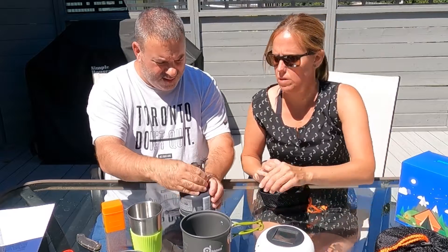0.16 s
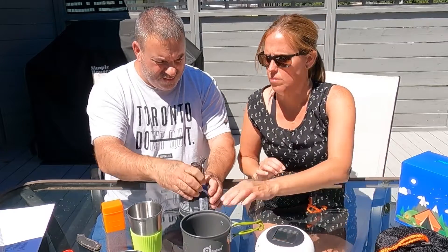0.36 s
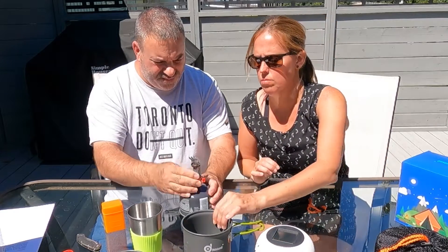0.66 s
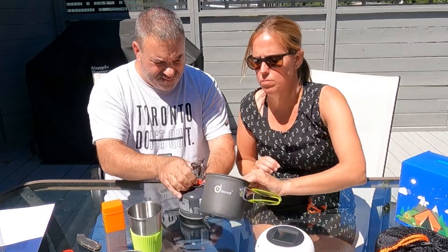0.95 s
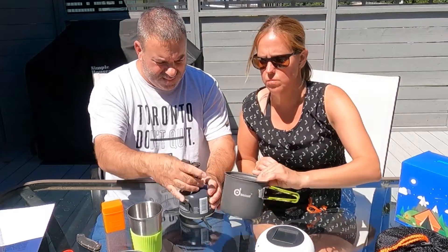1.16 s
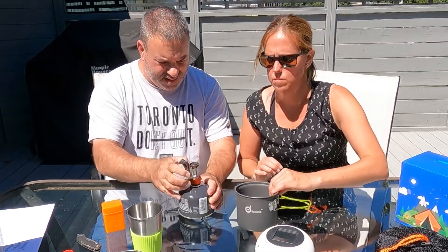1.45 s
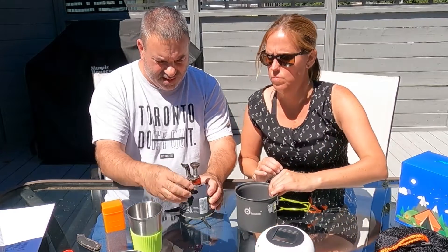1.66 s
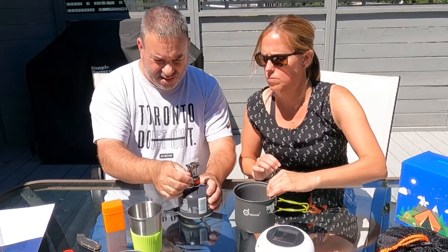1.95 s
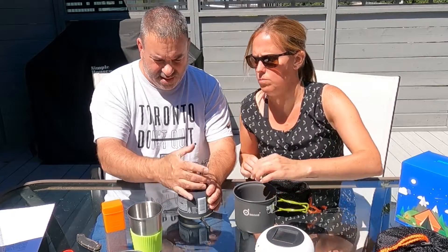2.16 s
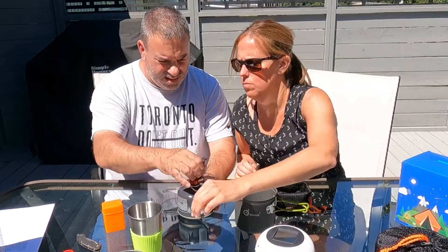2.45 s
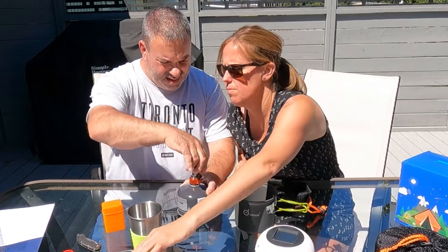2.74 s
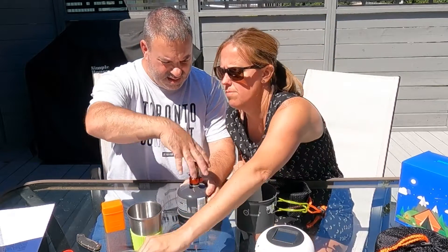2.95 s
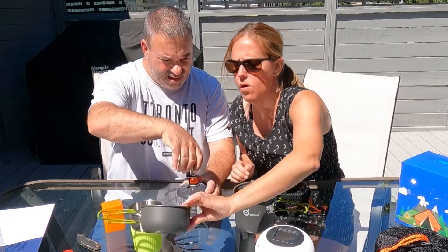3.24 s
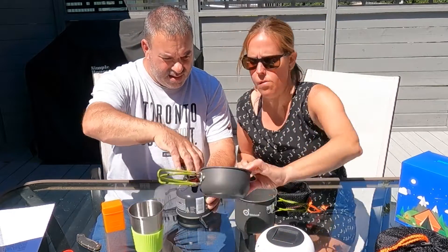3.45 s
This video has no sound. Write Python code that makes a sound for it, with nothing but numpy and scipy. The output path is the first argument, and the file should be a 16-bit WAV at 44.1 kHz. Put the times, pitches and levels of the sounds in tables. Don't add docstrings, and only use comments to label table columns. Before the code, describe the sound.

Metal camping cookware is handled: sharp snap, hollow pot knock, then a loud pan clang

```python
import sys
import numpy as np
from scipy import signal
from scipy.fft import rfft, irfft
from scipy.io import wavfile
from scipy.ndimage import uniform_filter1d

SR = 44100
rng = np.random.default_rng(int(sys.argv[2]) if len(sys.argv) > 2 else 0)


def generate_wav(sig):
    pcm = np.round(np.clip(np.atleast_2d(sig).T, -1, 1) * 32767).astype(np.int16)
    wavfile.write(sys.argv[1], SR, pcm)


def voltage_ratio(level):
    return 10 ** (np.asarray(level, float) / 20)


N = 158760

# frequency in Hz, level in dB per Hz.
TOWN_COLOUR = [(12, -30), (20, 2), (127, -9.5), (187, -15), (228, -13.5), (410, -16.5), (949, -17.5),
               (2670, -24), (16000, -57)]
# centre in Hz, width in Hz, height in dB.
TOWN_HUMPS = [(907, 536, 5.5), (2790, 400, 4.5)]
# start in seconds, length in seconds, level in dB, centre in Hz.
RUBS = [(0.018, 0.087, -55.5, 3860), (0., 0.14, -70, 10000), (0.241, 0.13, -64, 7800),
        (0.587, .2, -77.5, 9800), (1.248, 0.14, -82, 10000), (1.5, 0.113, -76.5, 9000),
        (1.776, 0.17, -81, 8030), (2.092, .08, -73.5, 9000), (2.748, 0.31, -79.5, 8000),
        (2.942, .13, -77, 9700), (3.14, .05, -80, 11000), (3.336, 0.046, -67, 5900)]
# centre in seconds, length in seconds, level in dB, pitch in Hz.
FAR_WHINE = (2.52, .12, -87, 10380)
# start in seconds, level in dB, centre in Hz, spread in octaves, 60 dB decay in seconds.
SNAPS = [(0.0918, -29.5, 5000, 0.41, 0.033), (0.0925, -31, 6900, 0.59, 0.038),
         (.094, -43, 1710, 0.5, 0.12), (.095, -28, 3040, 0.68, 0.11),
         (0.2816, -46, 10780, 0.087, .041), (.2823, -57, 5900, .4, .05),
         (.2824, -63, 15200, .09, .05), (.2835, -49, 6020, .05, .07), (.328, -70, 11500, 0.33, .06),
         (.3371, -54, 6300, .35, .03), (0.3368, -45, 4520, 0.27, .06), (.339, -45, 2520, 0.51, .17),
         (1.771, -45, 420, 0.97, 0.11), (2.0897, -55, 2400, .5, .02), (2.0896, -58, 8000, .5, .06)]
# start in seconds, level in dB,
# centre in Hz, spread in octaves, # 60 dB decay in seconds.
MORE_SNAPS = [(.2823, -68, 8850, 1.2, 0.1), (.69, -73, 11000, 0.95, .04), (0.7883, -68, 7800, 2, 0.035),
              (0.993, -71, 7800, 1.06, 0.041), (1.012, -75, 8000, 1.25, .04),
              (1.366, -76.5, 11000, 1.3, .03), (1.405, -81, 12000, 1, 0.033),
              (1.519, -76, 10900, 0.34, 0.036), (1.54, -68, 5270, .3, 0.071),
              (1.595, -70, 6850, 0.75, .04), (1.6701, -67, 8900, 1.11, 0.058),
              (1.714, -68, 8900, 1.5, .04), (1.758, -55.5, 4800, 0.51, 0.07),
              (1.7646, -45, 4480, 0.45, 0.06), (1.767, -48, 2200, 1.2, 0.13),
              (1.7644, -73, 9870, 1.34, .05), (2.0885, -51.5, 4660, 1, 0.074),
              (2.748, -55, 3030, 1.3, 0.19), (3.4006, -29.5, 11000, 0.34, 0.024),
              (3.3821, -37.5, 10700, 0.55, 0.016), (3.5028, -45, 7800, 1.11, 0.019)]
# frequency in Hz, level in dB, 60 dB decay in seconds.
CLACK_MODES = [(2290, -12, 0.048), (2453, -6, 0.11), (2600, -3.5, 0.12), (3110, 0, 0.077),
               (3650, 2.5, 0.069), (3970, -7, 0.16), (4670, -1, 0.049), (5276, -20, 0.054),
               (5670, 2, 0.036), (5981, 4, 0.026), (6710, -12.5, 0.035), (6940, -27, 0.069),
               (7687, -22, 0.1), (8050, -21, 0.077)]
CLINK_MODES = [(2040, -8, 0.18), (2510, 0, .13), (2643, 0, 0.12), (2876, -15, .2), (3596, -4, .12),
               (4050, -2, 0.066), (4260, -19, .15), (4500, -2, 0.061), (6100, -12, .05), (6670, -16, .07),
               (8200, -15, .03)]
TAP_MODES = [(2100, -19.5, .04), (2790, -11.5, 0.088), (3020, -9, 0.11), (3680, -9, .06), (3900, -2, 0.055),
             (4280, -1, 0.05), (4700, 2.5, 0.045), (5220, -5.5, 0.059), (5480, -12, 0.1)]
# start in seconds, level in dB.
CLACKS = [
    (.0921, -29.5),
    (.0975, -30.5),
    (.111, -54),
]
CLINKS = [
    (0.338, -44),
    (0.356, -53.5),
]
TAPS = [
    (1.7645, -42),
    (1.7805, -59),
    (1.797, -65),
    (2.0892, -59),
]
# centre in seconds, length in seconds, level in dB,
# pitch in Hz.
GUSTS = [(0.412, 0.15, -47, 75.8), (0.531, 0.26, -39.5, 28.08), (1.048, 0.11, -37, 66),
         (1.202, 0.092, -47.5, 70), (1.586, 0.049, -52, 130), (1.696, 0.27, -47.5, 73.5),
         (1.847, 0.054, -46.5, 120.8), (1.864, 0.043, -45, 55.3), (2.019, 0.042, -47, 155),
         (2.135, 0.06, -47.5, 122.5), (3.592, 0.055, -41, 82)]
# frequency in Hz, level in dB, 60 dB decay in seconds.
HOLLOW_MODES = [(161, -21, 0.13), (245, -8.5, 0.046), (366, -12, 0.067), (502, -24.5, 0.27),
                (596.4, 0, 0.055), (625, -3, 0.045), (743, -15.5, 0.061)]
# start in seconds, level in dB.
SET_DOWN = [
    (1.7135, -23),
    (1.743, -35.5),
    (1.752, -41),
]
# frequency in Hz, level in dB, 60 dB decay in seconds.
PAN_MODES = [(554, -19, .55), (905, -1, .11), (1000, 0, .12), (960, 8, .022), (1416, -7.5, .135),
             (2011, -5, .155), (2624, -17.5, .36), (2636, -25, .4), (2895, -3, .022), (3015, -22, .14),
             (3212, -17, .13), (3500, -8, .025)]
CUP_MODES = [(4765, -5, .1), (4775, -7, .14), (5066, -10, .085), (5823, -20, .17), (5837, -24, .17),
             (6751, -26, .11), (8035, -7, .085), (8046, -12, .1), (8666, -6, .09), (8680, -9, .13),
             (9428, -4, .135)]
POT_MODES = [(158, -9, 0.5), (205, -12, 0.36), (350, -5, 0.1), (556, -3, 0.17), (640, 5, .022),
             (680, -3, .09), (883, -13, 0.2), (1475, -10, .15), (2121, -17, .18), (2580, -6, 0.13),
             (3025, -17, 0.14), (4550, -17, .07), (5100, -20, .04), (7440, -33, 0.11)]
# frequency in Hz, level in dB per Hz.
GLANCE_BODY = [(88, -35), (150, -5.5), (649, -20), (998, 2.5), (1290, -20), (3100, -9.5), (5250, -17),
               (11000, -46), (16000, -36)]
PAN_BODY = [(88, -61), (150, -24.5), (1080, -11), (2450, -6), (3490, -2), (6260, -15), (8730, -18),
            (14000, -23), (16000, -47.5)]
POT_BODY = [(59, -44), (100, -11.5), (608, -3.5), (1950, -9.5), (2630, -13), (2860, -10), (7610, -31.5),
            (13800, -39), (16000, -75)]
# start in seconds, clear modes in dB, dense modes in dB,
# dense 60 dB decay in seconds near 1 kHz, tilt in dB per octave.
GLANCE_BLOWS = [
    (3.3817, -31.5, -25, 0.072, -1.5),
]
PAN_BLOWS = [
    (3.4009, -7.5, -15.5, 0.036, -2),
    (3.414, -53, -30.5, 0.28, -6),
]
POT_BLOWS = [
    (3.5028, -19, -21, 0.13, -0.26),
    (3.511, -50, -22, 0.11, -0.83),
    (3.541, -42, -31, 0.21, -1.3),
    (3.56, -49, -41, 0.36, -1.1),
]
# start in seconds, level in dB.
CUP_BLOWS = [
    (3.4009, -24.5),
    (3.419, -50),
]


def colour(table, hz):
    table = np.array(table, float)
    return np.interp(np.log(np.maximum(hz, 1)), np.log(table[:, 0]), table[:, 1])


def walk(rate_hz):
    k = int(SR / rate_hz)
    steps = np.repeat(rng.standard_normal(N // k + 1), k)
    return 1.3 * uniform_filter1d(uniform_filter1d(steps, k), k)[:N]


def band(x, hz, octaves):
    f = np.maximum(np.fft.rfftfreq(len(x), 1 / SR), 1)
    y = irfft(rfft(x) * np.exp(-.5 * (np.log2(f / hz) / octaves) ** 2), len(x))
    return y / np.std(y)


def decay(t, t60):
    return np.exp(-np.log(1000) * t / t60)


def add(out, s, sound):
    i = int(s * SR)
    out[i:i + len(sound)] += sound[:N - i]


def onset(y, t, rise_s):
    y = y * (1 - np.exp(-t / rise_s)) * np.minimum(1, (t[-1] - t) * 20)
    return y / np.sqrt(np.mean(y[:SR // 100] ** 2))


def ring(hz, db, t60, rise_s=0.00051, split=.002):
    t = np.arange(SR // 4) / SR
    fade = voltage_ratio(db)[:, None] * decay(t, np.clip(t60, .005, .6)[:, None])
    beat_hz = split * hz * (.5 + rng.random(len(hz)))
    pair = 1 + 0.19 * np.cos(2 * np.pi * beat_hz[:, None] * t)
    y = (fade * pair * np.sin(2 * np.pi * hz[:, None] * t)).sum(0)
    return onset(y, t, rise_s)


def crowd(shape_db, t60, centre_hz):
    t = np.arange(SR // 4) / SR
    f = np.maximum(np.fft.rfftfreq(len(t), 1 / SR), 1)
    spec = rfft(rng.standard_normal(len(t))) * voltage_ratio(shape_db(f))
    y = 0
    for hz in 100 * 2 ** (np.arange(16) / 2):
        share = np.cos(np.pi / 2 * np.clip(2 * np.log2(f / hz), -1, 1)) ** 2
        band_t60 = max(t60 * (hz / centre_hz) ** -0.62, .004)
        y = y + irfft(spec * share, len(t)) * decay(t, band_t60)
    return onset(y, t, 0.0001)


def town():
    f = np.fft.rfftfreq(N, 1 / SR)
    db = colour(TOWN_COLOUR, f)
    for centre, width, height_db in TOWN_HUMPS:
        db = db + height_db * np.exp(-.5 * ((f - centre) / (width / 2)) ** 2)
    spec = rfft(rng.standard_normal(N)) * voltage_ratio(db)
    out, swell = 0, walk(0.47)
    for k in range(11):
        share = np.cos(np.pi / 2 * np.clip(np.log2(np.maximum(f, 1) / 20) - k, -1, 1)) ** 2
        flutter_db = (2.5 if k < 3 else .7) * walk(5.33)
        out = out + irfft(spec * share, N) * voltage_ratio(0.19 * swell + flutter_db)
    return voltage_ratio(-50.5) * out / np.std(out)


def rubbing():
    out = np.zeros(N)
    for s, length, db, hz in RUBS:
        n = int(length * SR)
        grains = rng.standard_normal(n) * voltage_ratio(2.0 * rng.exponential(size=n))
        add(out, s, voltage_ratio(db) * band(grains, hz, 0.4) * signal.windows.tukey(n, .85))
    return out


def far_whine():
    t = np.arange(N) / SR
    s, length, db, hz = FAR_WHINE
    return voltage_ratio(db + 4 * walk(17)) * np.sin(2 * np.pi * hz * t) / (1 + ((t - s) / length) ** 4)


def snaps_and_ticks():
    out = np.zeros(N)
    for table in (SNAPS, MORE_SNAPS):
        for s, db, hz, octaves, t60 in table:
            add(out, s, voltage_ratio(db) * crowd(lambda f: -17.5 * abs(np.log2(f / hz) / octaves), t60, hz))
    return out


def knocks(rows, modes, split):
    out = np.zeros(N)
    hz, mode_db, t60 = np.array(modes, float).T
    for k, (s, db) in enumerate(rows):
        shift_db = 3 * rng.standard_normal(len(hz)) * (k > 0)
        add(out, s, voltage_ratio(db) * ring(hz, mode_db + shift_db, t60, rise_s=0.00012, split=split))
    return out


def stove_parts():
    return (knocks(CLACKS, CLACK_MODES, .004) + knocks(CLINKS, CLINK_MODES, .004)
            + knocks(TAPS, TAP_MODES, .004))


def gusts():
    t = np.arange(N) / SR
    out = np.zeros(N)
    for s, length, db, hz in GUSTS:
        swell = np.exp(-.5 * ((t - s) / (length / 3)) ** 2)
        out += voltage_ratio(db) * swell * np.sin(2 * np.pi * (hz * t + 0.59 * walk(10)))
    return out


def pot_set_down():
    out = np.zeros(N)
    hz, mode_db, t60 = np.array(HOLLOW_MODES, float).T
    for s, db in SET_DOWN:
        add(out, s, voltage_ratio(db) * ring(hz, mode_db, t60, rise_s=0.011, split=0.0082))
    return out


def blows(rows, modes, body, split):
    out = np.zeros(N)
    hz, db, t60 = np.array(modes, float).T
    for s, modes_db, body_db, body_t60, tilt_db in rows:
        dense = crowd(lambda f: colour(body, f) + tilt_db * np.log2(f / 2000), body_t60, 1380)
        add(out, s, voltage_ratio(body_db) * dense)
        add(out, s, voltage_ratio(modes_db) * ring(hz, db, t60, split=split))
    return out


def pan_clang():
    return blows(GLANCE_BLOWS, PAN_MODES, GLANCE_BODY, 0.004) + blows(PAN_BLOWS, PAN_MODES, PAN_BODY, 0.00044)


def steel_cup():
    return knocks(CUP_BLOWS, CUP_MODES, 0)


def pot_struck():
    return blows(POT_BLOWS, POT_MODES, POT_BODY, 0.012)


def patio(x):
    t = np.arange(SR // 2) / SR
    tail = band(rng.standard_normal(len(t)), 2500, 1.8) * decay(t, .13) * (t > .008)
    tail = tail / np.sqrt(np.sum(tail ** 2))
    return x + voltage_ratio(-14) * signal.fftconvolve(x, tail)[:N]


def scene():
    near = snaps_and_ticks() + stove_parts() + pot_set_down() + pan_clang() + steel_cup() + pot_struck()
    near = signal.sosfilt(signal.butter(2, 125, "high", fs=SR, output="sos"), near)
    return (town() + rubbing() + far_whine() + gusts() + patio(near))[None]


def gate(x):
    size = 32
    f, _, z = signal.stft(x, SR, nperseg=2048)
    for i in range(int(np.searchsorted(f, 12000)), len(f), size):
        level = np.sqrt(np.mean(abs(z[:, i:i + size]) ** 2, axis=1, keepdims=True))
        threshold = voltage_ratio(-116 + 1.2 * rng.standard_normal(level.shape))
        z[:, i:i + size] *= np.clip((level / threshold - 1) * 20, 0, 1)
    return signal.istft(z, SR, nperseg=2048)[1][:, :N]


def low_pass(x):
    return signal.sosfilt(signal.butter(12, 16650, fs=SR, output="sos"), x)


def record(dry):
    x = dry / (1 + np.abs(dry / .9) ** 6) ** (1 / 6)
    x = signal.sosfilt(signal.ellip(8, .5, 50, 16300, fs=SR, output="sos"), x)
    return low_pass(gate(x))


dry = scene()
out = record(dry)
generate_wav(out)
```